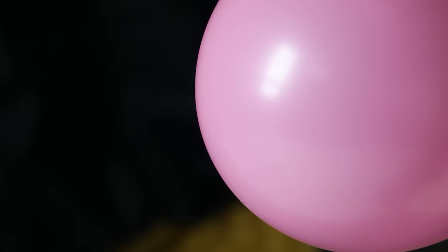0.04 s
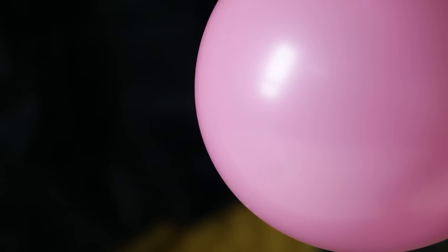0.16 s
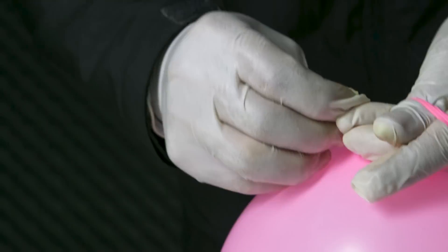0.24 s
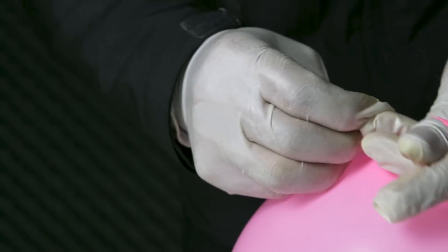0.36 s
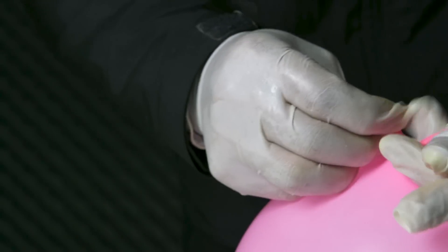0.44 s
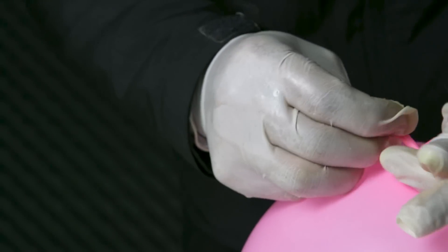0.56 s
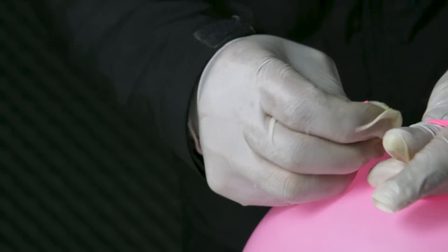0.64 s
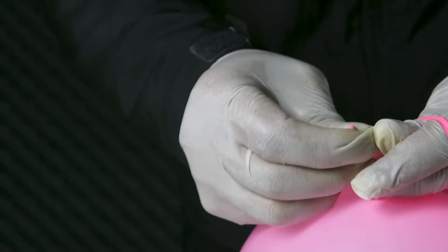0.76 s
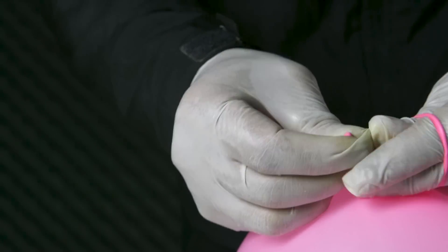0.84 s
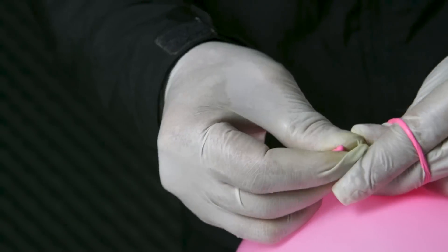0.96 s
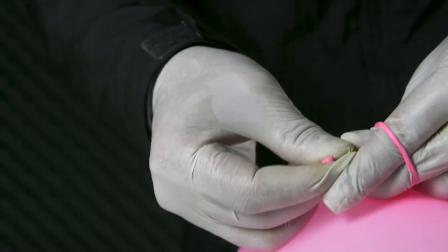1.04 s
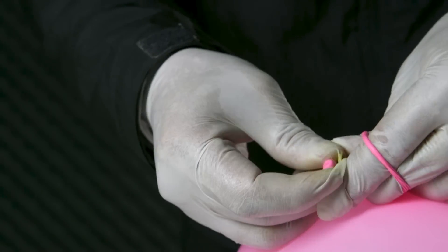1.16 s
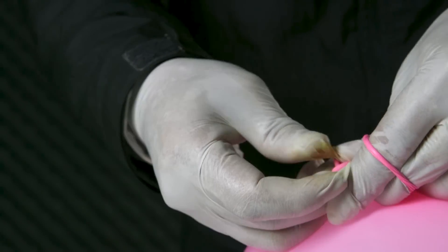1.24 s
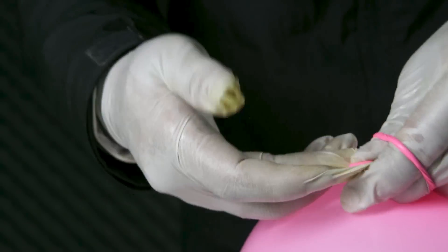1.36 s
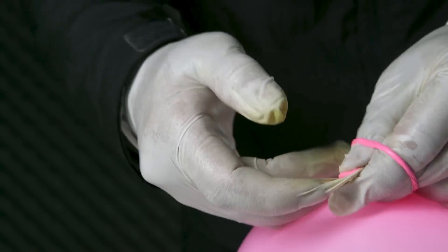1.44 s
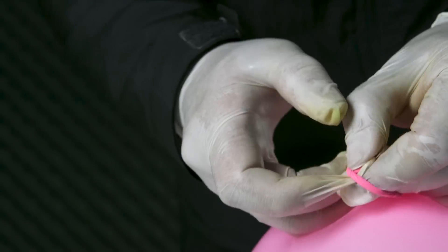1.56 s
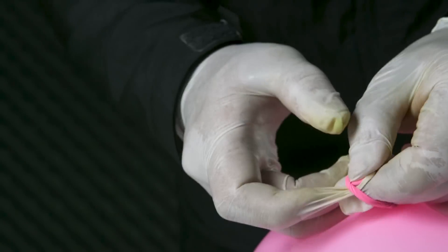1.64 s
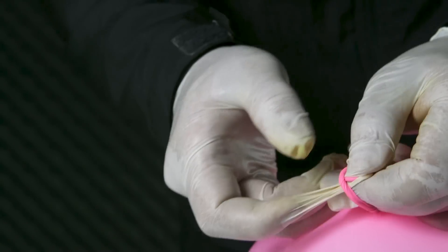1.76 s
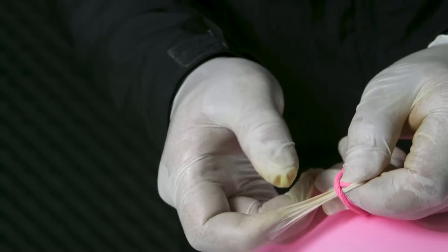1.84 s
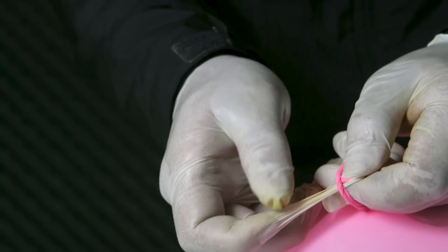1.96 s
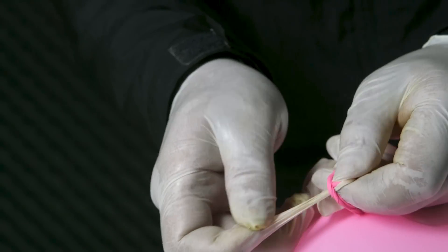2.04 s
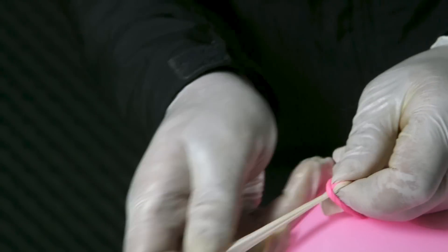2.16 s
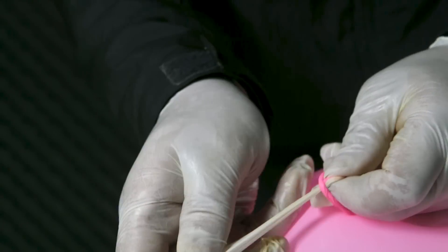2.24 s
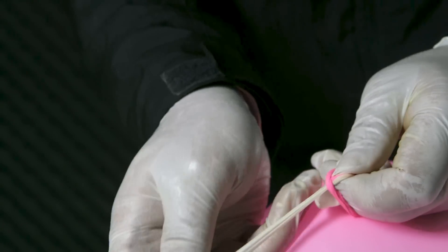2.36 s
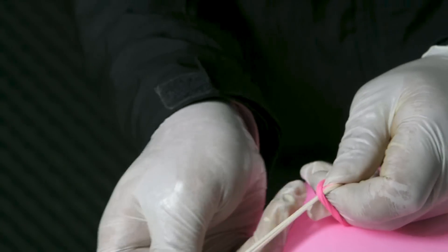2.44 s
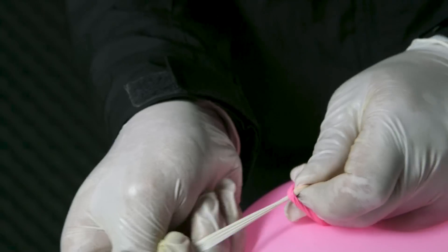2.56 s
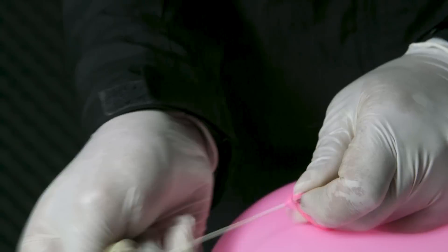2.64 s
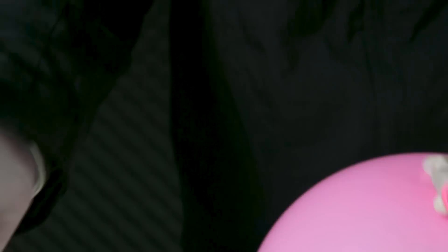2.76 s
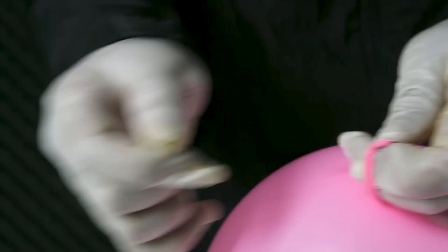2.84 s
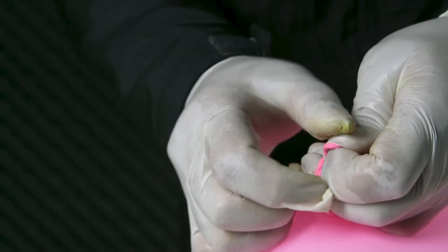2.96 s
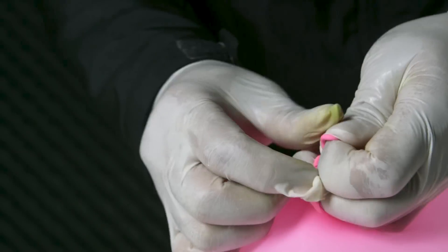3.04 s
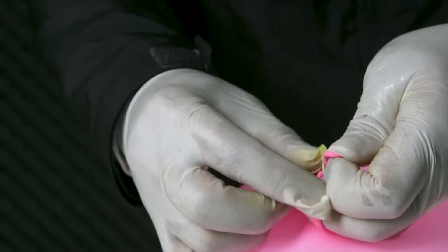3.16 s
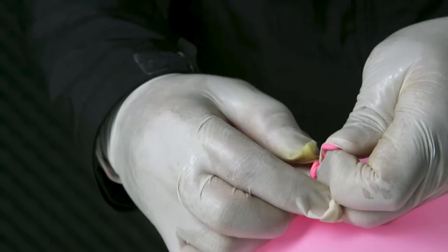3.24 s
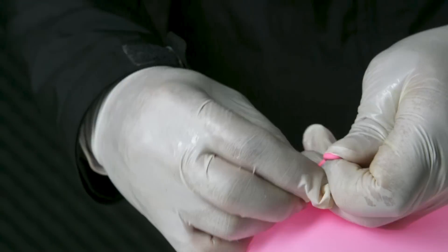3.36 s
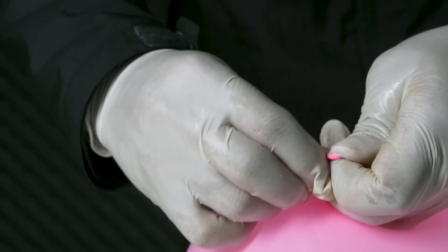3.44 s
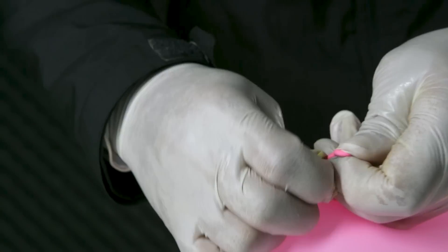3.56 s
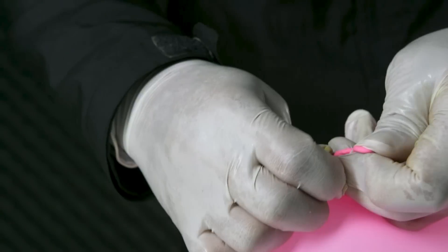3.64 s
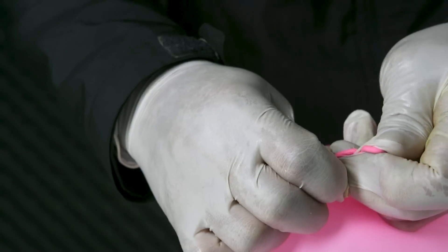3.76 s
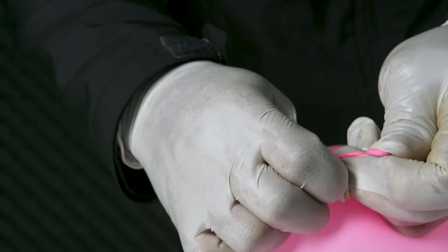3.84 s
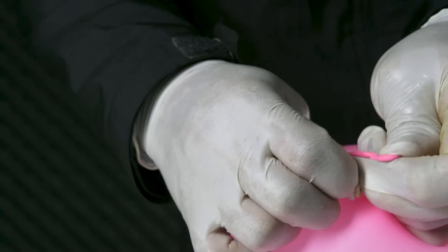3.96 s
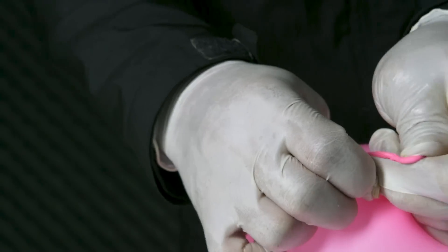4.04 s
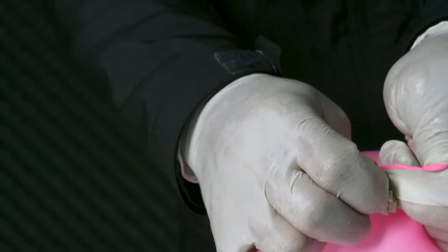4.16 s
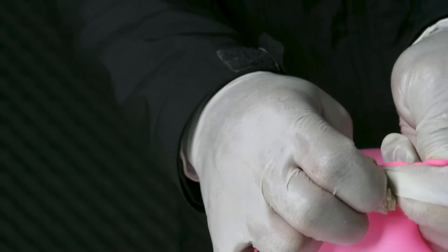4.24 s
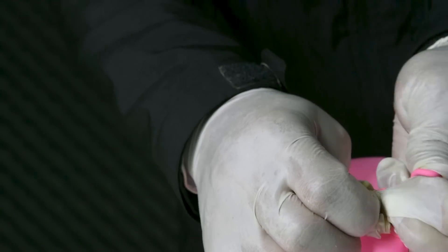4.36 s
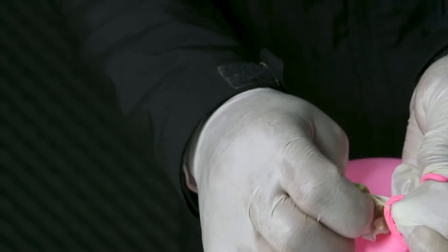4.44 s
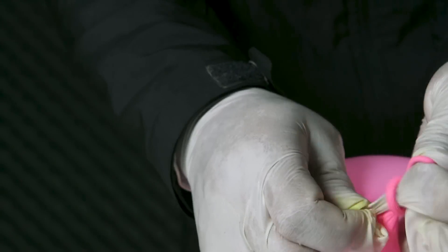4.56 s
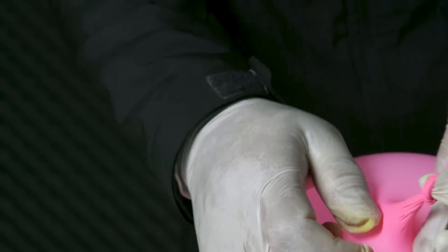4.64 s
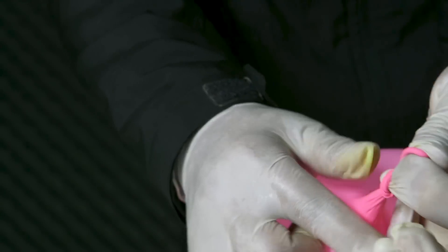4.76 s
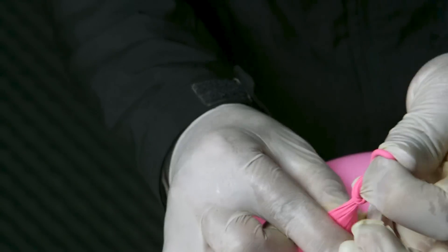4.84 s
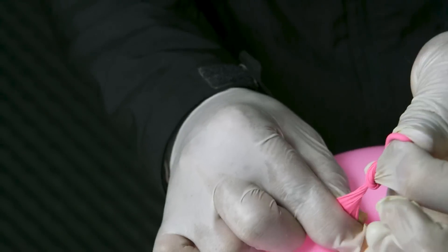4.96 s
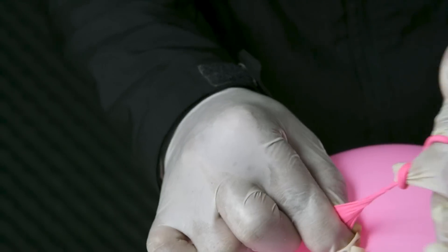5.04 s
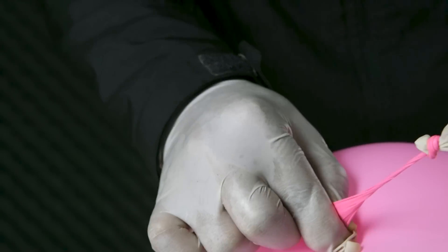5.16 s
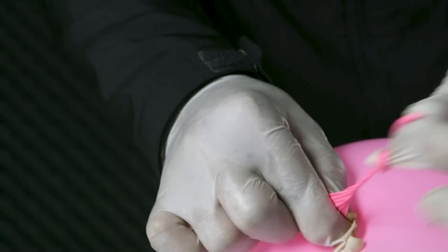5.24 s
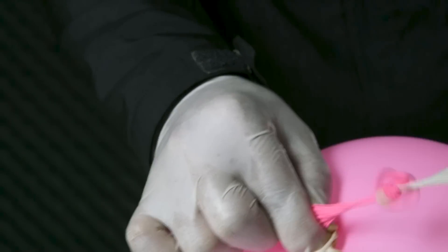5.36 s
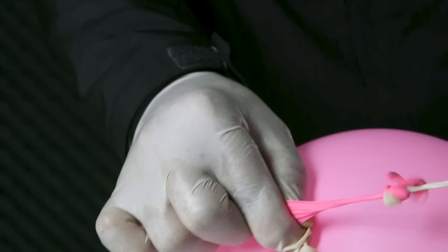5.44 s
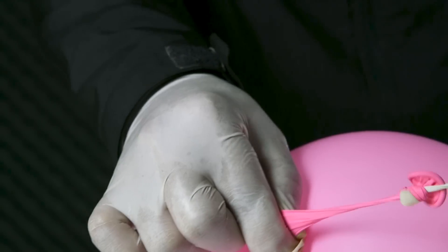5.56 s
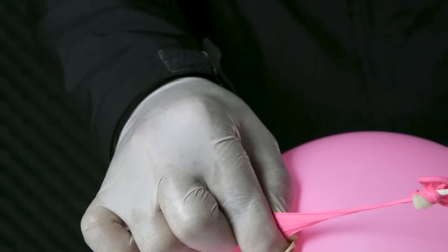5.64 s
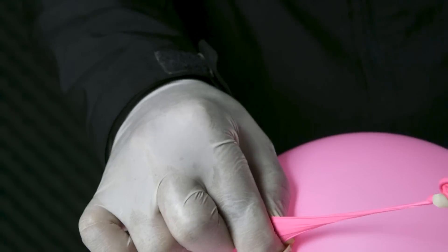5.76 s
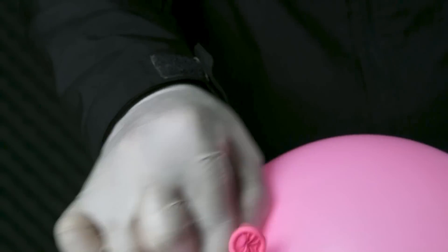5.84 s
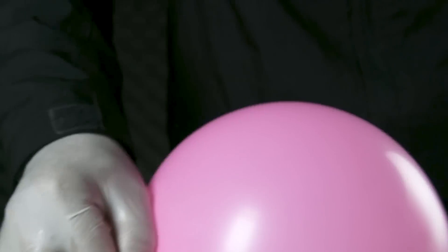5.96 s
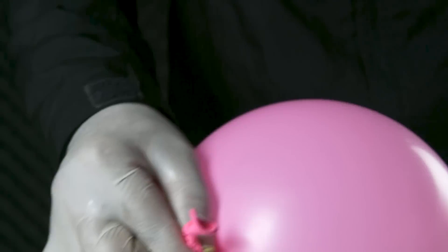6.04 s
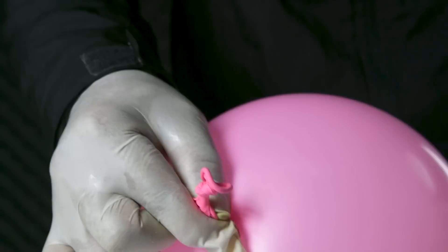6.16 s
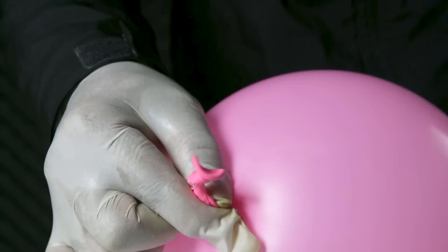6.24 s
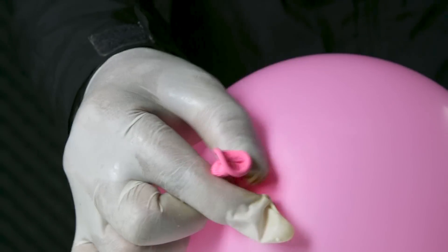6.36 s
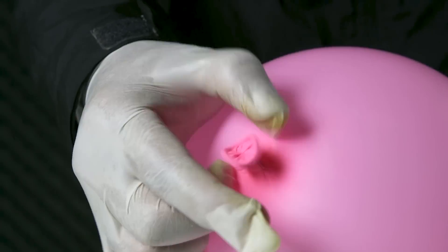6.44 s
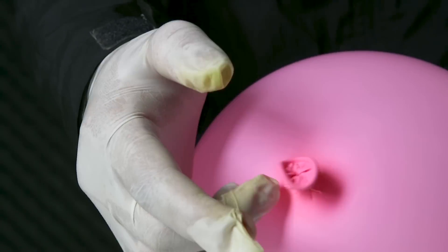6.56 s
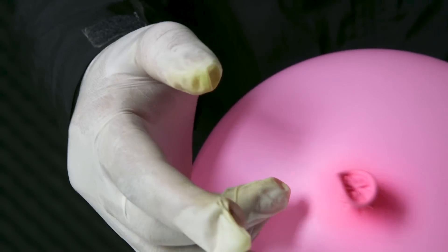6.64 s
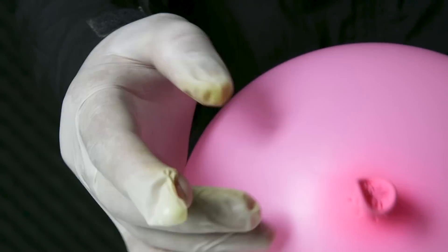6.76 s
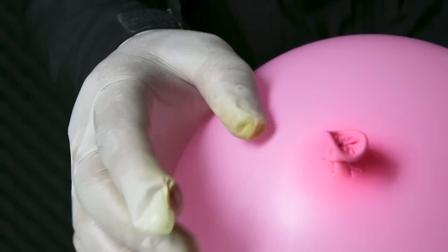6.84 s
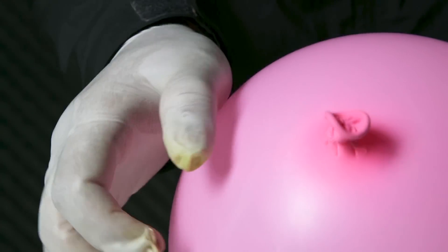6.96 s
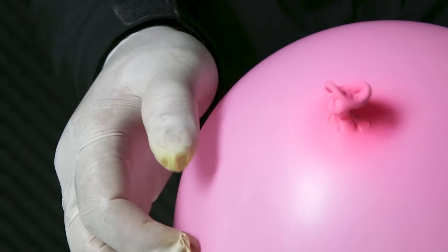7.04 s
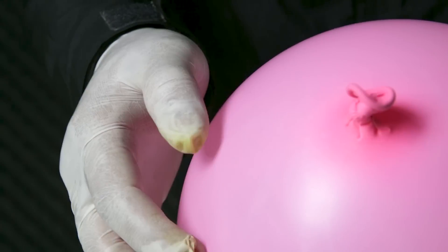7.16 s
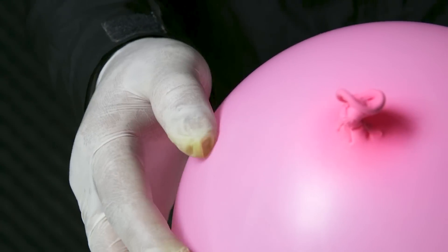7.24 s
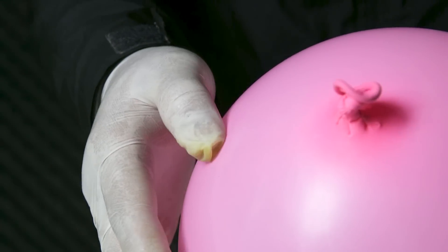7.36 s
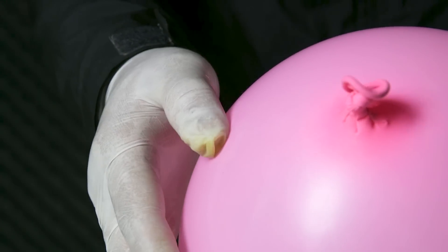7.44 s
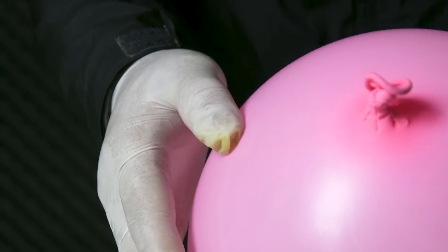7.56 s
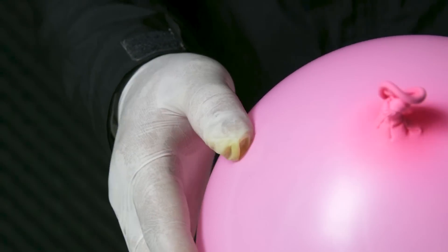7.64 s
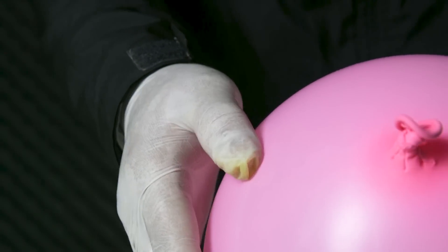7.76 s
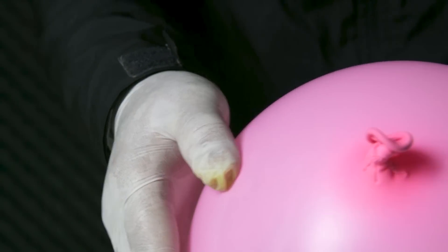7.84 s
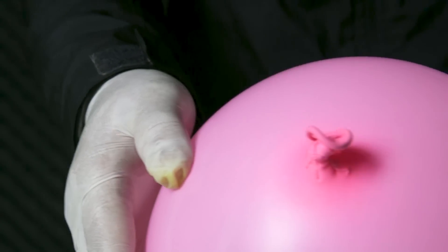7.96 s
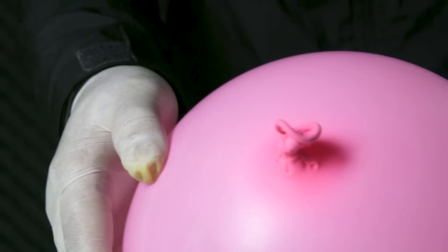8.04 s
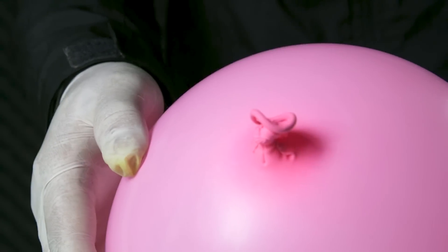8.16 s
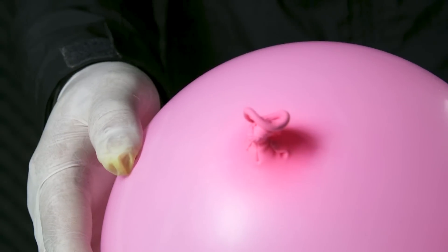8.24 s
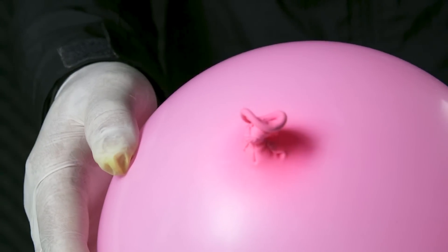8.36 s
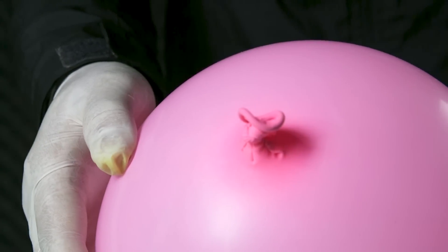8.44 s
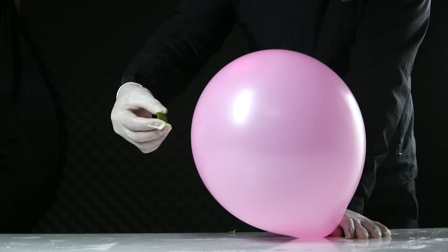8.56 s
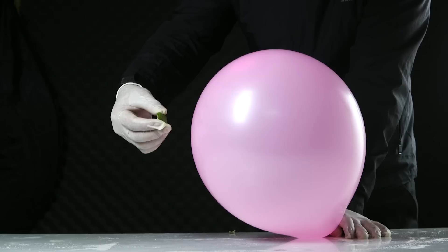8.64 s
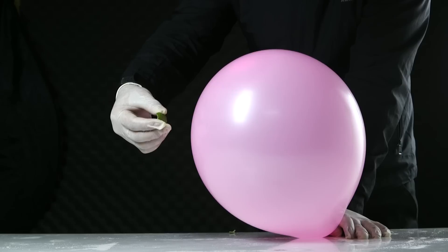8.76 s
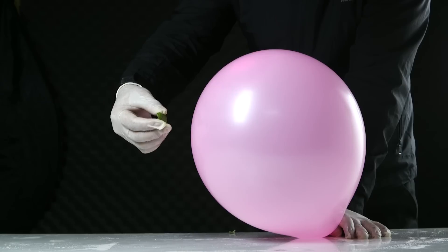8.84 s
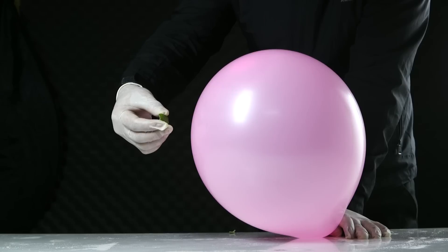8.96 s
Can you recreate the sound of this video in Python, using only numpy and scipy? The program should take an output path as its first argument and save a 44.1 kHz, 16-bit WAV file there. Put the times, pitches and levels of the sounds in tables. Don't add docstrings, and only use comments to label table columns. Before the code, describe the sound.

Sticky rubber lets go in sharp, bright snaps and tiny ticks as gloved fingers stretch a balloon's neck. Rubbing and knocks make the air inside ring hollow and short. A dense burst of cracks leads to one heavy snap with a low, boomy shiver, then a few dull pats on the taut skin. Handling grows sparse and quiet. Very close, dry indoor sound with slight rumble and hiss.

```python
import sys
import numpy as np
from scipy import signal
from scipy.fft import rfft, irfft, next_fast_len
from scipy.io import wavfile
from scipy.ndimage import map_coordinates

SR = 44100
rng = np.random.default_rng(int(sys.argv[2]) if len(sys.argv) > 2 else 0)


def level_to_linear(level):
    exponent = np.asarray(level, float) / 20
    return 10 ** exponent


def wav_record(signal):
    frames = np.transpose(np.atleast_2d(signal))
    bounded = np.clip(frames, -1, 1)
    quanta = np.round(bounded * 32767).astype(np.int16)
    wavfile.write(sys.argv[1], SR, quanta)


N = 396900
SIZE = 8192

# f/Hz, width/Hz, level/dB
CAVITY = [(198, 17, 0.5), (296.3, 77, 1), (441, 37, -1.5), (535, 23, 2.5), (648, 64, -5.5), (847, 73, -1),
          (998, 110, -6.5), (1222, 300, -3.5), (1550, 68, -15)]
# t/s, peak/dB, low part/dB, top part/dB, time to fall 60 dB/s
SNAPS = [(.0651, -17.5, -16, -4.5, .0084), (.3621, -16, -8.5, 1.5, .004), (.5433, -17, 2.5, 4.5, .006),
         (.5486, -4.5, -9, 1.5, .0061), (1.2744, -14, -4, 4.5, .0045), (1.3246, -20, -18.5, 7, .004),
         (1.3352, -9.5, -5.5, 3, .004), (1.3447, -16, 1, 22, .004), (1.4188, -3, -4, -2.5, .005),
         (1.5456, -16.5, -2, 5, .007), (2.241, -9.5, 5.5, 7.5, .007), (2.7482, -1.5, -6.5, -2, .007),
         (4.48, -6, 0.5, 2.5, .017), (4.6128, -16, 7, 1, .029), (4.6601, -8.5, -4, -1, .021),
         (4.7055, -16.5, -3, 5, .009), (4.7268, -15.5, -2.5, -2.5, .02), (4.737, -13.5, -0.8, 1, .012),
         (4.8206, -16, 4, 5.5, .0055), (5.4185, -12.5, -2.5, 10.5, .004), (5.4361, -10, 2.5, 4.5, .006),
         (5.441, -17.5, -1.2, -3, .02), (5.9352, 2.5, -2, -0.46, .034), (6.5448, -8.5, 5, 1, .021)]
# t/s, peak/dB, top part/dB, time to fall 60 dB/s
WEAK_SNAPS = [(.0289, -23, 0.25, 0.011), (0.057, -24, -3.5, 0.052), (0.4086, -22, -6.5, 0.0096),
              (.9565, -26, 2, 0.0058), (0.966, -22.5, 22, 0.0046), (1.241, -27, -11, 0.0036),
              (1.3734, -26.5, 12, 0.0042), (1.5599, -28.5, 2.5, 0.014), (1.6415, -24, 6, 0.0075),
              (1.6554, -21, 3.5, .015), (2.0151, -31, 21, .005), (2.8893, -26.5, 12.5, 0.0044),
              (2.902, -28.5, 4, 0.023), (3.0351, -23.5, -4, 0.0036), (3.251, -28.5, -11.5, .004),
              (3.3509, -29, 2.5, .013), (3.3941, -23, 10.5, 0.027), (3.9305, -29, 5.5, 0.0065),
              (4.4723, -20.5, 2.5, .015), (4.5595, -28, 5, 0.014), (4.601, -26, 1, 0.0048),
              (6.435, -27.5, -1.5, 0.0094), (6.4576, -30, -2, 0.027), (6.4703, -26, 8.5, 0.0051),
              (6.4956, -28, 17, .02), (6.5295, -26, -0.2, 0.04)]


def unit(x):
    return x / np.sqrt(np.mean(x ** 2) + 1e-20)


def peak_one(rows):
    return rows / np.abs(rows).max(axis=1, keepdims=True)


def gain_at(points, hz):
    f, db = np.transpose(points)
    return level_to_linear(np.interp(np.log(hz + 1), np.log(f + 1), db))


def filtered(x, response):
    padded = next_fast_len(x.shape[-1] + SIZE)
    spectrum = rfft(x, padded) * response(np.fft.rfftfreq(padded, 1 / SR))
    return irfft(spectrum, padded)[..., :x.shape[-1]]


def resonance(hz, centre_hz, width_hz):
    return 1j * hz * width_hz / (centre_hz ** 2 - hz ** 2 + 1j * hz * width_hz)


def drift(rate):
    points = rng.standard_normal(int(N * rate / SR) + 4)
    return map_coordinates(points, [np.arange(N) * rate / SR])


def curves(rows):
    s, *columns = np.transpose(rows)
    return [np.interp(np.arange(N) / SR, s, column) for column in columns]


def placed(times, rows):
    at = np.round(times * SR).astype(int)[:, None] + np.arange(rows.shape[1])
    return np.bincount(at.ravel(), rows.ravel(), N + 2 * SIZE)[:N]


def cracks():
    weak_snaps = [(s, db, -3 + 0.86 * top_db, top_db, t60) for s, db, top_db, t60 in WEAK_SNAPS]
    s, db, low_db, top_db, t60 = np.array(SNAPS + weak_snaps).T[..., None]
    t = np.arange(SIZE // 2) / SR
    noise = rng.standard_normal((len(s), 2 * len(t)))
    tear = noise[:, ::2] ** 2 * np.sign(noise[:, 1::2])
    spike = 3.5 * level_to_linear(-60 * t / 0.0015)
    tearing = level_to_linear(-60 * t / np.clip(t60, .004, .034))
    answer = level_to_linear(-25.0 - 60 * t / 0.098)
    burst = tear * (spike + tearing + answer) * (1 - np.exp(-t / 0.00052))

    def colour(f):
        low = level_to_linear(low_db - 0.4) * resonance(f, 2900, 2400)
        middle = resonance(f, 6500, 2600)
        top = level_to_linear(top_db - 2.5) * resonance(f, 12500, 10000)
        return (low - middle + top) * resonance(f, 2300, 20000)

    return placed(s[:, 0], level_to_linear(db - 1.85) * peak_one(filtered(burst, colour)))


def cavity(hz, scatter_db=0):
    centre_hz, width_hz, db = np.array(CAVITY).T[..., None]
    sign = (-1.) ** np.arange(len(CAVITY))[:, None]
    return np.sum(sign * level_to_linear(db + scatter_db) * resonance(hz, centre_hz, width_hz), axis=-2)


def blows():
    # t/s, peak/dB, f/Hz
    knocks = [(.0575, -33.5, 516), (0.2124, -28, 260), (.485, -39.5, 450), (0.5486, -24, 940),
              (.7199, -36, 840), (1.548, -35.5, 1070), (2.242, -31.5, 970), (2.7481, -30, 710),
              (2.876, -39.5, 642), (2.9028, -36.5, 930), (2.9715, -39, 215), (3.3268, -38, 850),
              (3.3927, -29.5, 1630), (3.587, -43, 427), (4.0243, -36.5, 1020), (4.481, -27, 1410),
              (4.6134, -20, 1550), (4.6596, -6, 1060), (4.7063, -22.5, 1110), (4.7276, -12.5, 856),
              (4.81, -31.5, 1001), (4.8209, -11, 1145), (5.4422, -28.5, 930)]
    # t/s, peak/dB, f/Hz
    pats = [(5.9349, -19, 441), (6.429, -32.5, 189), (6.4523, -33.5, 190), (6.4967, -27, 400),
            (6.5274, -29, 424), (6.5466, -15, 201), (6.7788, -31.5, 150), (6.8467, -41, 430),
            (6.8711, -28, 155), (6.9486, -37, 217), (7.1543, -41, 500), (7.1771, -31.5, 249.5),
            (7.232, -34.5, 270), (7.3566, -38.5, 322), (7.4119, -34, 438), (7.5082, -46, 419),
            (8.3908, -44.5, 206)]
    s, db, pitch_hz = np.array(knocks + pats).T[..., None]
    t60 = 0.065 * (pitch_hz / 500) ** -.3 * level_to_linear(-.15 * db)
    t = np.arange(SIZE) / SR
    scatter_db = 3 * rng.standard_normal((len(s), len(CAVITY), 1))
    push_fade = level_to_linear(-60 * t / 0.0032) + level_to_linear(-15.5 - 60 * t / 0.099)
    push = rng.standard_normal((len(s), len(t))) * push_fade

    def balloon(f):
        spot = resonance(f, pitch_hz, .7 * pitch_hz + 220) / (1 + 1j * f / (4 * pitch_hz))
        own_ring = .5 * resonance(f, pitch_hz, .12 * pitch_hz)
        return spot * (0.39 + cavity(f, scatter_db) + own_ring)

    damping = level_to_linear(-18 * t / np.clip(t60, .02, .4))
    return placed(s[:, 0], level_to_linear(db - 0.13) * peak_one(filtered(push, balloon) * damping))


def wobble():
    # t/s, level/dB, f/Hz, rise/s, time to fall 60 dB/s
    shakes = [
        (.03, -32, 66.7, 0.037, 0.34),
        (.2125, -27, 170, .003, .16),
        (2.956, -35, 70.5, 0.011, 0.18),
        (4.05, -27, 79, 0.045, 0.33),
        (4.651, -31.5, 87.6, 0.0092, 0.23),
        (5.94, -32, 185, 0.0069, 0.34),
        (5.965, -23, 54.3, 0.027, 0.43),
        (6.431, -15.5, 75.1, 0.011, 0.061),
        (6.86, -32.5, 55, .01, .2),
    ]
    s, db, hz, rise, t60 = np.array(shakes).T[..., None]
    t = np.arange(2 * SIZE) / SR
    swell = (1 - np.exp(-t / rise)) ** 2
    return placed(s[:, 0], level_to_linear(db - 60 * t / t60) * swell * np.sin(2 * np.pi * hz * t))


def effort():
    # t/s of most effort, time to fade 10 dB/s, crinkle/dB, rubbing/dB
    moves = [(.06, 0.1, -55.5, -61), (.229, 0.2, -70, -57), (.549, 0.16, -59, -54.5), (.93, 0.3, -59, -62),
             (1.2, 0.47, -64, -71), (1.432, 0.1, -55, -57), (1.64, 0.06, -51, -53.5),
             (1.901, 0.04, -64, -57), (2.255, 0.18, -64.5, -57), (2.7, 0.35, -58.5, -56.5),
             (2.888, 0.0632, -48.5, -59), (2.99, 0.26, -64.5, -59), (3.25, 0.66, -58, -65.5),
             (3.48, 0.38, -60, -66), (3.63, 0.08, -55, -52), (4.036, 0.12, -63.5, -56),
             (4.47, 0.27, -55, -57), (4.689, .11, -48.5, -45), (4.829, 0.1344, -53, -46),
             (5.101, .14, -57.5, -54), (5.438, 0.03, -49, -69), (5.971, 0.0313, -39.5, -39),
             (6.46, 0.154, -53, -57), (6.534, 0.0779, -45, -43), (6.868, 0.34, -64.5, -52.5),
             (7.05, 0.1, -70, -51.5), (7.225, 0.11, -77, -47), (7.428, 0.17, -74, -59.5),
             (7.551, 0.12, -86, -56.5), (7.842, .035, -86, -48)]
    # t/s, crinkle/dB, rubbing/dB
    fidget = [
        (0, -67, -69),
        (2.5, -69, -66),
        (4.199, -67.5, -68),
        (6.3, -65, -63.5),
        (6.9, -82, -73),
        (7.72, -78.5, -73),
        (8.1, -74, -73),
        (9, -80.5, -85),
    ]
    s, fade, *levels_db = np.array(moves).T[..., None]
    t = np.arange(0, N + 100, 100) / SR
    from_peak = np.where(t < s, (s - t) / 0.83, t - s)
    shape_db = -10 * (from_peak / fade) ** 1.4
    moving = [np.sqrt(np.sum(level_to_linear(db + shape_db) ** 2, axis=0)) for db in levels_db]
    return [np.hypot(np.interp(np.arange(N) / SR, t, gain), level_to_linear(rest_db))
            for gain, rest_db in zip(moving, curves(fidget))]


def slips(rate, spread_db, t60):
    luck = np.minimum(rng.exponential(size=N), 2.5)
    size = level_to_linear(spread_db * luck) * (rng.random(N) < rate / SR)
    puff = signal.lfilter([1], [1, -level_to_linear(-60 / (t60 * SR))], size)
    return unit(puff * rng.standard_normal(N))


def hands():
    # f/Hz, level per Hz/dB
    crinkle_tone = [(530, -27.5), (900, -8.5), (1230, -9.5), (1540, 0), (5520, -8.5), (13400, -6),
                    (15300, -5), (16500, -24)]
    crinkling, rubbing = effort()
    clump = drift(25)
    folds = 0
    for hz in (2500, 5500, 12000):
        swell = level_to_linear(3.5 * drift(9))
        fold = slips(rate=160, spread_db=5.0, t60=.004) + .85 * rng.standard_normal(N)
        folds = folds + filtered(swell * fold, lambda f: resonance(f, hz, .7 * hz))
    grains = unit(folds) + .25 * rng.standard_normal(N)
    crinkle = unit(level_to_linear(1.0 * clump) * filtered(grains, lambda f: gain_at(crinkle_tone, f)))

    def skin(f):
        return (cavity(f) + 0.21) * resonance(f, 450, 740) + 0.022 * resonance(f, 2600, 2000) ** 2

    drag = slips(rate=250, spread_db=4.5, t60=.008) + .55 * rng.standard_normal(N)
    rub = unit(level_to_linear(1.9 * clump) * filtered(drag, skin))
    return level_to_linear(-3.5) * crinkling * crinkle + level_to_linear(-1.0) * rubbing * rub


def small_ticks():
    luck = rng.random((round(45 * N / SR), 3))
    s = luck[:, 0] * (N - 1) / SR
    busy_db = 20 * np.log10(effort()[0][(s * SR).astype(int)])
    size_db = -5 * np.log(np.clip(luck[:, 1], .1, 1))
    crackle = np.c_[s, busy_db + 8 + size_db, 5500 * 6 ** (luck[:, 2] - .5)]
    release = np.array([row[:2] for row in SNAPS + WEAK_SNAPS])
    luck = rng.random((len(release), 2))
    creep_s = release[:, 0] - .007 * (.3 + luck[:, 0])
    creep_db = release[:, 1] - 22 - 8 * luck[:, 0]
    return np.r_[crackle, np.c_[creep_s, creep_db, 4000 + 7000 * luck[:, 1]]]


def ticks():
    # t/s, peak/dB, f/Hz
    wide_folds = [(.211, -34, 2180), (.4865, -29.5, 2550), (.657, -32.5, 4500), (.7194, -30.5, 3360),
                  (1.601, -32.5, 4000), (1.6106, -27, 3250), (1.8345, -42.5, 2260), (1.862, -40, 3360),
                  (1.913, -40, 3360), (1.9816, -39.5, 2200), (2.833, -33, 4200), (2.8504, -30.5, 3100),
                  (3.327, -36, 2000), (3.4505, -34.5, 2770), (3.5244, -34, 3400), (3.5888, -33.5, 2800),
                  (3.7968, -39, 3300), (4.0211, -29.5, 3600), (4.183, -37.5, 3000), (4.3881, -33, 4590),
                  (4.7925, -32.5, 1900), (4.9668, -36, 3920), (5.176, -36, 3140), (5.688, -40.5, 3020),
                  (5.8054, -34.5, 4970), (6.8689, -36, 2980), (7.4136, -38.5, 4220), (7.607, -47.5, 4950),
                  (8.393, -48, 4020)]
    # t/s, peak/dB, f/Hz
    creases = [(0.6861, -29, 9000), (.748, -37.5, 12000), (1.0399, -38.5, 7040), (1.076, -40.5, 8600),
               (1.1076, -42.5, 5500), (1.1412, -35.5, 7700), (1.179, -37.5, 9620), (1.3888, -33, 8650),
               (1.408, -28, 10800), (1.5402, -22.5, 7350), (1.6857, -37, 9800), (2.0302, -37.5, 7100),
               (2.4337, -32.5, 8820), (2.9229, -33.5, 10400), (3.189, -32.5, 8270), (3.2864, -29.5, 9100),
               (3.4997, -32.5, 6270), (4.052, -35.5, 9450), (4.329, -32.5, 8500), (4.4314, -32, 6980),
               (4.9797, -34.5, 5180), (5.1206, -33, 9160), (5.3589, -29.5, 6820), (5.412, -31.5, 8700),
               (6.363, -37.5, 11300), (6.7534, -31.5, 8840), (7.064, -40.5, 5930), (7.2318, -35, 6010),
               (7.4272, -38.5, 7500), (7.8197, -45, 6150)]
    s, db, hz = np.r_[wide_folds, creases, small_ticks()].T[..., None]
    t = np.arange(SIZE // 8) / SR
    fade = level_to_linear(-60 * t / 0.0022) + level_to_linear(-18.5 - 60 * t / 0.078)
    puff = rng.standard_normal((len(s), len(t))) * fade

    def colour(f):
        return (resonance(f, hz, .8 * hz) + .2) * resonance(f, 4000, 22000)

    return placed(s[:, 0], level_to_linear(db - 0.2) * peak_one(filtered(puff, colour)))


def slides():
    # t/s, length/s, level/dB, f/Hz, width/Hz
    rubs = [
        (2.502, 0.3, -69, 3430, 1510),
        (4.356, 0.082, -54, 4050, 1800),
        (5.041, 0.1, -55, 2180, 2200),
        (6.091, 0.11, -64.5, 2930, 907),
        (6.194, 0.087, -63.5, 2940, 687),
        (7.939, 0.02, -65, 1997, 402),
        (8.648, 0.035, -64.5, 2150, 1300),
    ]
    s, length, db, hz, width_hz = np.array(rubs).T[..., None]
    t = np.arange(2 * SIZE) / SR
    roughness = drift(150)[:len(s) * len(t)].reshape(len(s), -1)
    grain = rng.standard_normal((len(s), len(t))) * level_to_linear(3.7 * roughness)
    band = filtered(grain, lambda f: resonance(f, hz, width_hz) ** 2)
    stroke = np.sqrt(np.sin(np.pi * np.clip(t / length, 0, 1)) + 1e-12)
    return placed(s[:, 0], level_to_linear(db) * stroke * band / band.std(axis=1, keepdims=True))


def grip():
    # t/s, level/dB, f/Hz
    squeeze = [(0, -54.5, 38), (.5, -60.5, 44.85), (1.5, -58, 45), (2.1, -58.5, 50.06), (2.8, -55.5, 50.07),
               (3.6, -60.5, 43.16), (4.1, -54.5, 41.17), (4.5, -56.5, 57.3), (5.3, -63.5, 47.5),
               (5.52, -55.5, 39.86), (5.75, -59, 49), (8.2, -62, 49.96), (8.7, -61.5, 58.8), (9, -61, 56.5)]
    partials_db = [-6.5, -1.2, -13, -7]
    # f/Hz, level per Hz/dB
    rumble_tone = [(12, -51.5), (20, -18), (91, -3), (129, -6), (400, -22), (520, -49.5), (880, -120)]
    db, hz = curves(squeeze)
    turn = 2 * np.pi * np.cumsum(hz * (1 + 0.043 * drift(3.6))) / SR
    hum = 0
    for k, level in enumerate(partials_db, 1):
        hum = hum + level_to_linear(level) * (drift(22) * np.cos(k * turn) + drift(22) * np.sin(k * turn))
    rumble = filtered(rng.standard_normal(N), lambda f: gain_at(rumble_tone, f))
    return level_to_linear(db) * (unit(hum) + 1.0 * unit(rumble))


def room():
    # f/Hz, level per Hz/dB
    hiss_tone = [(120, -32.5), (200, -1), (236, -4.5), (335, -5), (770, -22.5), (3980, -35), (15000, -38),
                 (16500, -45)]
    return level_to_linear(-69) * unit(filtered(rng.standard_normal(N), lambda f: gain_at(hiss_tone, f)))


def scene():
    handling = cracks() + blows() + wobble() + hands() + ticks() + slides()
    return (handling + grip() + room())[None]


def roll_off(x):
    return signal.sosfilt(signal.butter(12, 17010, fs=SR, output="sos"), x)


def record(dry):
    held = dry / (1 + np.abs(dry / .75) ** 6) ** (1 / 6)
    held = filtered(held, lambda f: np.clip((17000 - f) / 1000, 0, 1))
    return roll_off(held)


dry = scene()
out = record(dry)
wav_record(out)
```